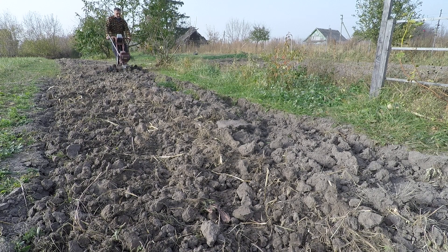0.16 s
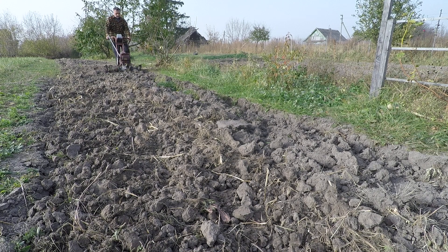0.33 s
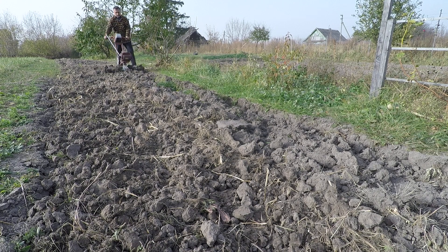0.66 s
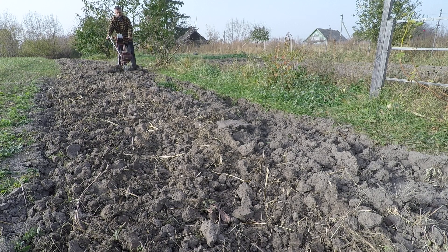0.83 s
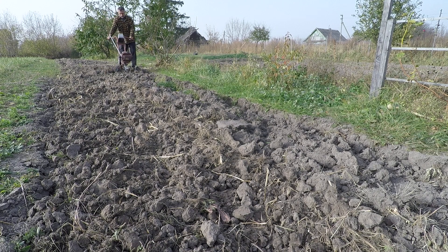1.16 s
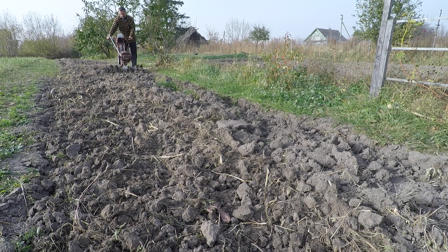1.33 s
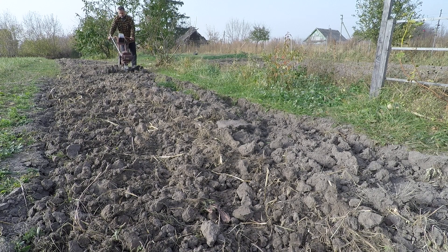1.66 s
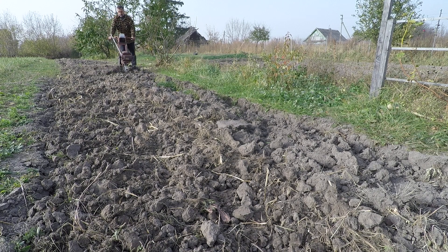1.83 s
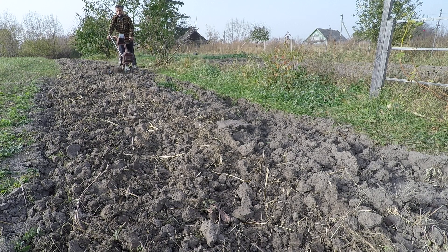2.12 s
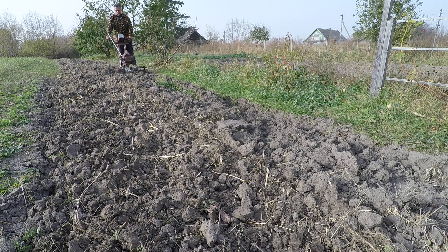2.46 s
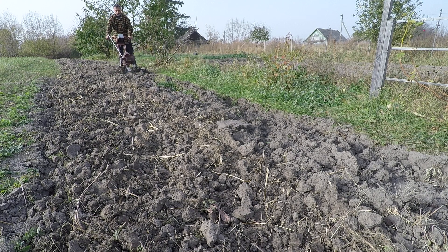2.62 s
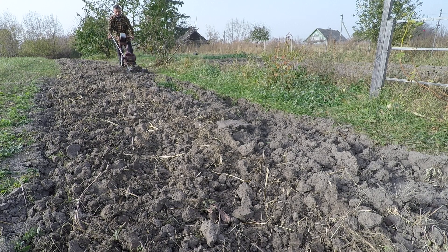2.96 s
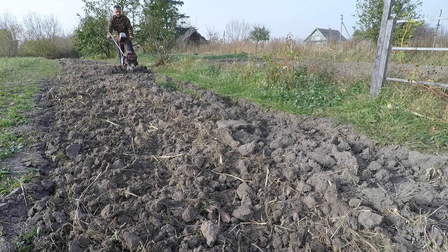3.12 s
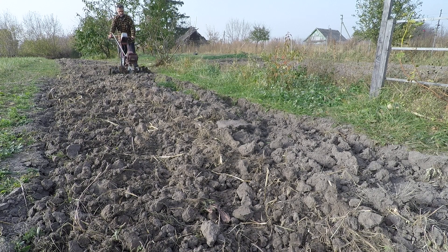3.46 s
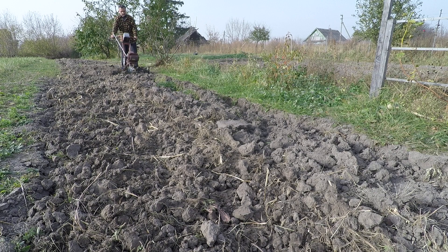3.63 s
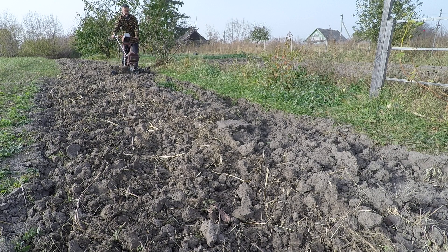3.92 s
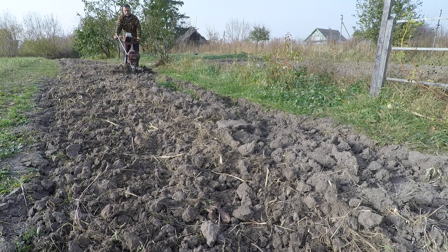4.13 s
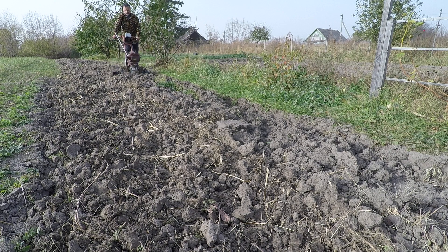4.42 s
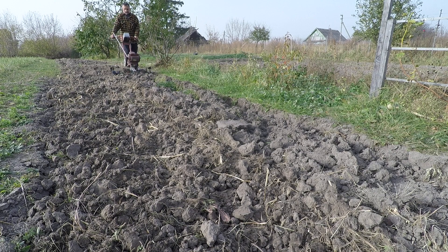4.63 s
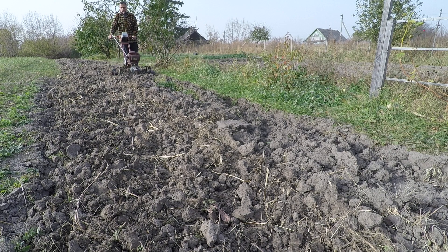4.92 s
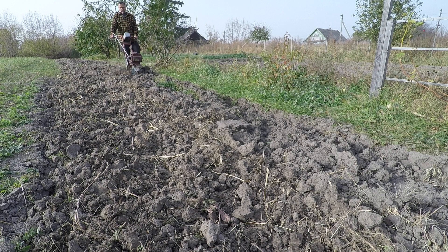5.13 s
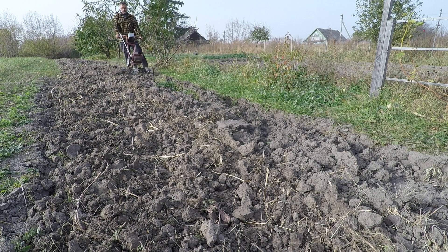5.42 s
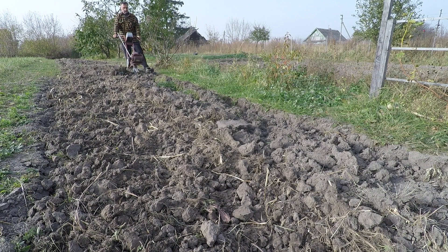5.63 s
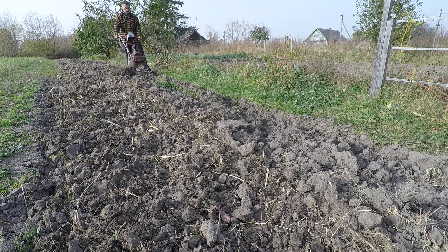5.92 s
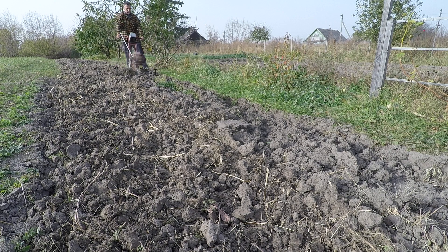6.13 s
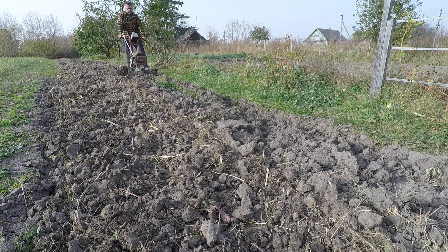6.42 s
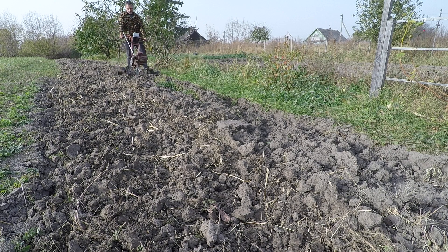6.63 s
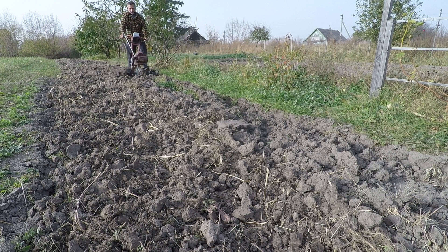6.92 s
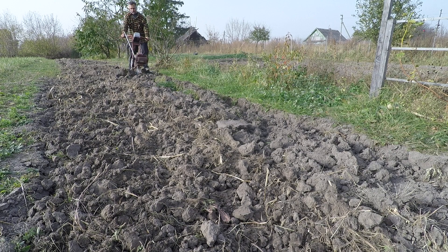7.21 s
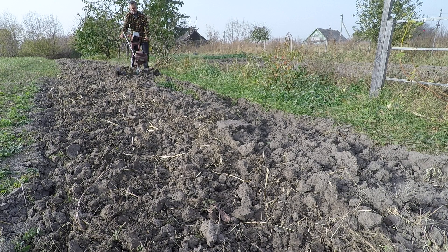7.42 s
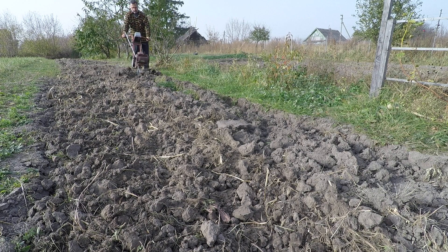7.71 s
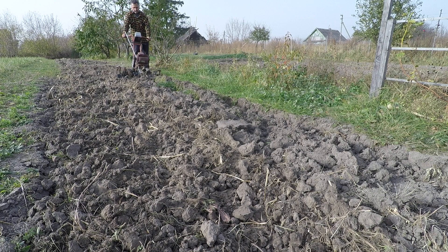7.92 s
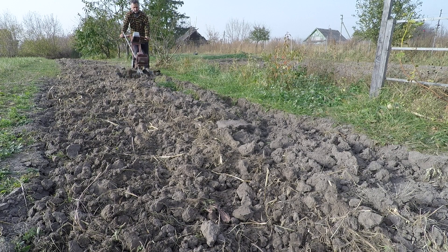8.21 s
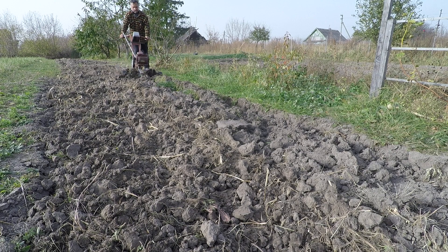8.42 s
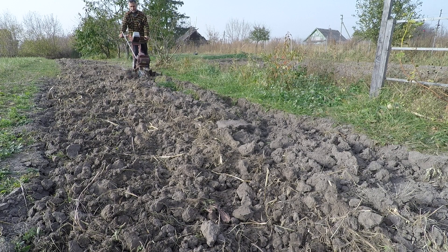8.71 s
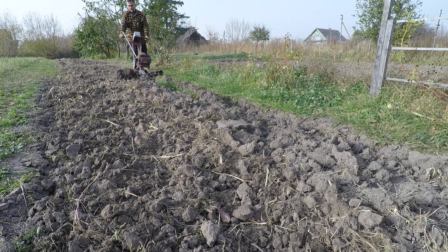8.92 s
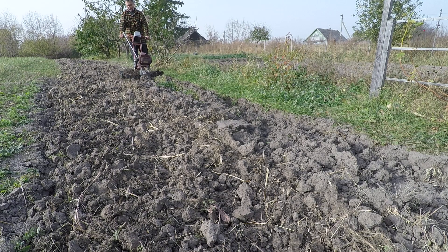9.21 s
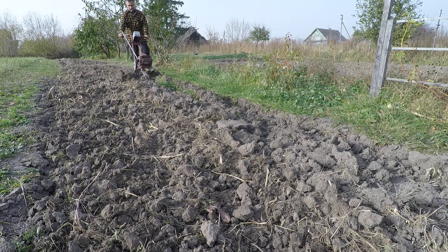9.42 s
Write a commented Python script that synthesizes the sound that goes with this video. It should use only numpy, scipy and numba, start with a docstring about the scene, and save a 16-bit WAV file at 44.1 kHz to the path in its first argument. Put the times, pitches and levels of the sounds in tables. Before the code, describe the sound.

An electric cultivator runs throughout in an open plot, heard from a distance in dry air: a steady, rough whirr with a low motor hum near 340 Hz, rapid gear knocking and a ringing housing. It throbs about seven times a second, with a faster flutter near 24, and wavers slightly under load. Fine grit hisses and ticks faintly, briefly clearer near 5.9 s; a barely audible high whistle stays constant. Wind hits the bare microphone as deep, muffled rumble: a thump at the start, scattered puffs to 3.5 s, stronger gusts at 4.1 and 4.6 s, frequent buffets from 5 to 6.6 s, then the heaviest booming bursts at 7.1-7.5 and 7.9 s, slightly rounded by overload. More thuds follow at 8.2-8.3 s before it eases, leaving the machine clearer. Small stones ping the tines near 1.6, 4.1, 8.3-8.4 and 9.5 s. It ends still running.

```python
"""Wind gusts rumble on a bare microphone over the knocking whirr of an electric cultivator in hard ground.
Wind is band-passed noise under a moving low-pass; buffets are short bursts of integrated noise.
Gear teeth knock in noise bursts that ring the housing, throbbing with each turn of pinion and wheel.
Soil ticks on the guard as random impulses, stones ping the tines as decaying sines, and the motor drive
whistles on faint steady lines."""
import sys
import numpy as np
from scipy import signal
from scipy.fft import rfft, irfft, next_fast_len
from scipy.io import wavfile
from scipy.ndimage import uniform_filter1d
from numba import njit

SR = 44100
rng = np.random.default_rng(int(sys.argv[2]) if len(sys.argv) > 2 else 0)


def master(y):
    """Save y as 16-bit WAV."""
    cut = np.clip(np.atleast_2d(y).T, -1, 1)
    pcm = np.round(cut * 32767)  # scale
    wavfile.write(sys.argv[1], SR, pcm.astype(np.int16))


N = 422037

# breeze rumble on the microphone: (time [s], level [dB])
BREEZE = [(0, -32), (.8, -35.5), (1.3, -39), (2.2, -38.5), (3.2, -39.5), (3.9, -38), (4.3, -29), (5.3, -28),
          (5.8, -26.5), (6.8, -24.5), (7.3, -43), (7.72, -36), (8.0, -25.5), (8.35, -29), (8.75, -40),
          (9.57, -35)]
BREEZE_SHARP_DB, FLUTTER_DB, FLUTTER_PER_S = -21.5, 3, 14
# bell-shaped gusts: (centre [s], peak level [dB], half length [s], sharpness [dB])
GUSTS = [(0.027, -19.5, 0.019, -15), (0.262, -30.0, 0.03, -16), (0.433, -21.5, 0.042, -20),
         (0.826, -35, 0.034, -16), (1.528, -22, 0.024, -20.5), (1.74, -30.5, 0.063, -31),
         (2.077, -29, 0.018, -14), (2.312, -29, 0.036, -28), (2.42, -28, 0.022, -32),
         (2.627, -21.5, 0.077, -21), (2.913, -28.5, 0.05, -32), (3.494, -24.5, 0.048, -12),
         (4.1, -14.5, 0.046, -19.5), (4.378, -19.5, 0.024, -25), (4.556, -12, 0.024, -19.5),
         (4.765, -19.5, 0.02, -21.5), (4.957, -17.5, 0.058, -24), (5.267, -23, 0.024, -20),
         (5.473, -20.3, 0.022, -25), (5.555, -18, 0.022, -16.5), (5.71, -19.2, 0.069, -18),
         (5.83, -17, 0.02, -23), (5.937, -17.5, 0.05, -7), (6.11, -20.5, 0.038, -18),
         (6.44, -19, 0.038, -26), (6.602, -21.2, 0.023, -19), (6.924, -22.1, 0.022, -23),
         (7.095, -14, 0.034, -7.5), (7.255, -12.5, 0.062, -16.5), (7.44, -20.5, 0.056, -9.5),
         (7.546, -17, 0.014, -21), (7.62, -17.5, 0.022, -19), (7.9, -10.4, 0.047, -9),
         (8.187, -15.5, 0.044, -18.5), (8.3, -17, 0.034, -16), (8.464, -23, 0.02, -26),
         (8.657, -26.7, 0.1, -27), (8.902, -28, 0.021, -18), (9.168, -27, 0.06, -16.5),
         (9.368, -23, 0.017, -27), (9.534, -27.5, 0.042, -12)]
# sudden buffets: (centre [s], level [dB rms], low-pass corner [Hz], length [s])
BUFFETS = [(2.074, -23, 88.5, .04), (4.107, -29, 260, 0.032), (4.572, -27, 254, 0.047),
           (4.891, -29, 217, 0.044), (5.003, -28.5, 234, 0.041), (5.649, -26, 198, 0.062),
           (5.933, -26, 298, 0.043), (7.105, -16.5, 275, 0.053), (7.209, -16.5, 205, 0.066),
           (7.27, -18, 160, 0.049), (7.38, -27, 344, 0.039), (7.42, -19.5, 270, 0.061),
           (7.484, -20, 220, 0.0318), (7.86, -19, 285, 0.066), (7.898, -19.5, 330, 0.056),
           (7.935, -18, 740, 0.0279), (8.261, -19, 315, 0.029), (9.521, -33.5, 245, 0.036)]
# stones on a tine: (time [s], level [dB])
STONES = [(0.3466, -39), (1.5582, -29), (1.8627, -34), (2.3805, -42), (4.0886, -30), (5.0615, -35),
          (8.32, -29), (8.403, -30), (9.223, -37), (9.523, -28)]
# tine modes: (frequency [Hz], level [dB], 60 dB decay time [s])
TINE_MODES = [(1128, -1.5, 0.06), (1496, -5, 0.052), (1230, -6, 0.03)]
# motor drive's comb of faint lines: (frequency [Hz], mean level [dB rms])
WHISTLE_LINES = [(9539, -77.5), (9687, -76.5), (9763, -74.5), (9838, -75), (9913, -75), (10061, -72),
                 (10212, -78.5)]
# grit on the guard: (time [s], level [dB])
GRIT = [(0, -48), (.45, -47), (.7, -55), (1.75, -49), (2.1, -57), (3.0, -50.5), (3.85, -56), (5.4, -55),
        (5.6, -47), (5.94, -41), (6.02, -69), (6.55, -64), (6.7, -53), (8.4, -56), (9.1, -49), (9.57, -60)]
# motor speed: (time [s], knock rate [1/s])
KNOCK_RATE = [(0, 341), (2.2, 340.5), (2.75, 338.8), (3.75, 342), (5, 341.2), (9.57, 341)]
PINION_KNOCKS, WHEEL_KNOCKS = 14, 46  # knocks per turn, two a tooth
# colour of the motor and fan noise: (frequency [Hz], relative density [dB per Hz])
WHIRR_COLOUR = [(88, -49), (150, -2), (348, -7), (431, -9.5), (1290, -3), (1480, -3.5), (1830, -6.5),
                (2140, -2), (3550, -6.5), (4080, -2), (5360, -7), (14800, -27), (16000, -22)]
WHIRR_DB, HUM_DB, TAP_DB = -2.5, -12.5, -11.5  # relative, inside the machine
# housing and guard modes: (frequency [Hz], throbs per wheel turn [count])
HOUSING_MODES = [(403, 1), (655, 2), (730, 1), (1114, 1), (1480, 1), (2068, 1), (2172, 1), (2371, 2),
                 (2440, 1), (2885, 1), (2995, 2), (3100, 1), (3320, 1), (3913, 2), (3972, 2), (4023, 4),
                 (4070, 6), (4800, 1), (5650, 2), (7500, 1), (8000, 1), (8600, 3), (9810, 1), (11080, 4)]
# ringing of those modes: (width [Hz], relative level [dB], pinion throb [dB], wheel throb [dB])
HOUSING_RINGING = [(32.6, -25, 1.5, 0.5), (44, -14, -2, 2.5), (81, -17.5, -0.5, 3), (90, -25, 12, -2),
                   (105, -12, -0.5, 2), (17.2, -17.5, -1.5, 4.5), (20.7, -9.5, -0.5, 1),
                   (17.7, -11, 2.5, 2.5), (130, -17.5, -1, 6.5), (72, -12, -1, 1), (64, -16, 2.5, 5.5),
                   (21.5, -17, 0, 2), (100, -24.5, -3, 13), (9, -19, -3.5, -12), (20, -12, 1.5, 2.5),
                   (13, -19.5, 8, 13), (120, -16, -2, 7), (350, -17, 5.5, 5), (262, -20, 3.5, 4),
                   (300, -22, 3.5, -0.5), (375, -16.5, -0.5, 6.5), (300, -58, 8, 28), (346, -26, 0.5, 24),
                   (420, -24, 4.5, -1)]
# machine's level, wandering slightly as it works: (time [s], level [dB])
TILL = [(0, -38), (1.3, -39), (2.4, -38), (3.6, -39), (4.5, -39.5), (5.3, -39), (5.5, -38), (5.95, -36.5),
        (6.05, -39.5), (7.2, -36.5), (7.5, -38), (8.0, -37), (8.3, -38), (9.57, -36.5)]
# brief swells and dips of the machine: (centre [s], change [dB])
SWELLS = [(.43, 2.5), (1.36, 2), (1.45, -1.5), (4.0, -2.5), (4.5, 2.5), (4.87, 2.5), (5.36, -2.5),
          (5.45, 2), (6.24, 2.5), (6.77, 0.5), (7.48, -3), (7.59, 2), (8.21, -2.5), (9.32, 1.5)]
SWELL_HALF_S = 0.027
LURCH_DB, LURCH_PER_S = .5, 7  # the machine rocks on the clods
TOP_HZ = 15300


def undb(db):
    """Gain of a level in dB."""
    return 10 ** (np.asarray(db) / 20)


def unit(x):
    """Scaled to rms 1."""
    return x / np.sqrt(np.mean(x ** 2))


def curves(table):
    """Columns of a table, interpolated to one value a sample."""
    time_s, *columns = np.transpose(table)
    return [np.interp(np.arange(N) / SR, time_s, c) for c in columns]


def walk(per_s):
    """Random levels held 1 / per_s seconds and slewed twice, rms 1."""
    hold = int(SR / per_s)
    steps = np.repeat(rng.standard_normal(N // hold + 1), hold)
    slewed = uniform_filter1d(uniform_filter1d(steps, hold), hold)
    return unit(slewed[:N])


def sway(per_s):
    """A walk less its half-second running mean, rms 1."""
    level = walk(per_s)
    return unit(level - uniform_filter1d(level, SR // 2))


def ring(x, hz, width_hz):
    """One resonance, rms 1."""
    return unit(signal.lfilter(*signal.iirpeak(hz, hz / width_hz, fs=SR), x))


def band(x, lo_hz, hi_hz, order=2):
    """Band-pass, rms 1."""
    return unit(signal.sosfilt(signal.butter(order, [lo_hz, hi_hz], "band", fs=SR, output="sos"), x))


@njit
def low(x, hz):
    """State-variable low-pass whose corner moves every sample."""
    y, b, l = np.empty(len(x)), 0., 0.
    for i in range(len(x)):
        g = np.tan(np.pi * hz[i] / SR)
        v = (b + g * (x[i] - l)) / (1 + g * (g + np.sqrt(2)))
        y[i] = l + g * v
        b, l = 2 * v - b, 2 * y[i] - l
    return y


def gusting():
    """Level and sharpness of the wind: gust power adds to a fluttering breeze; sharpness is power-weighted."""
    t = np.arange(N) / SR
    power = undb(2 * (curves(BREEZE)[0] + FLUTTER_DB * sway(FLUTTER_PER_S)))
    weighted_sharp = BREEZE_SHARP_DB * power
    for s, peak_db, half_s, sharp_db in GUSTS:
        near = slice(max(int((s - .4) * SR), 0), int((s + .4) * SR))
        gust = undb(2 * peak_db) * np.exp(-((t[near] - s) / max(half_s, .01)) ** 2)
        power[near] += gust
        weighted_sharp[near] += sharp_db * gust
    return np.sqrt(power), weighted_sharp / power


def buffet(corner_hz, count):
    """Dense burst: integrated noise held to two octaves under the corner, hann-shaped, rms 1."""
    low_pass = signal.butter(4, corner_hz, fs=SR, output="sos")
    high_pass = signal.butter(1, corner_hz / 4, "high", fs=SR, output="sos")
    burst = signal.sosfilt(low_pass, np.cumsum(rng.standard_normal(8192)))
    burst = signal.sosfilt(high_pass, burst)[-count:]
    return unit(burst * np.hanning(count))


def wind():
    """Eddies on the bare port: sharper gusts shed smaller eddies, so the rumble reaches higher."""
    rumble, sharp_db = gusting()
    corner_hz = np.clip(230 * undb(.5 * sharp_db + 1.4 * walk(40)), 25, 900)
    eddies = band(rng.standard_normal(N), 19.2, 52.3, order=1)
    eddies = low(low(eddies, corner_hz), 3.0 * corner_hz)
    # gust strength sets the level; single eddies still stand out
    local_rms = np.sqrt(uniform_filter1d(eddies ** 2, int(.12 * SR)) + 1e-9)
    out = rumble * eddies / local_rms
    for s, db, reach_hz, length_s in BUFFETS:
        count = int(max(length_s, .01) * SR)
        at = int(s * SR) - count // 2
        out[at:at + count] += undb(db) * buffet(reach_hz, count)
    return out


def stones():
    """A short knock sets the tine modes ringing as decaying sines."""
    out, t = np.zeros(N), np.arange(SR // 5) / SR
    ping = sum(undb(db - 60 * t / t60_s) * np.sin(2 * np.pi * hz * t) for hz, db, t60_s in TINE_MODES)
    ping *= np.minimum(t / 0.0031, 1)  # 3.1 ms rise
    for s, level_db in STONES:
        at = int(s * SR)
        out[at:at + len(t)] += undb(level_db) * ping[:N - at]
    return out


def whistle():
    """Motor drive's steady tones, each wavering a little in level."""
    t, out = np.arange(N) / SR, 0
    for hz, db in WHISTLE_LINES:
        tone = np.sqrt(2) * np.sin(2 * np.pi * (hz * t + rng.random()))
        out = out + undb(db + 1.3 * walk(3)) * tone
    return out


def soil(bite, per_s=480, spread_db=3.0):
    """Grit ticks on the guard as random impulses over faint noise, denser as the load rises."""
    chance = rng.random((2, N))
    hit = chance[0] < per_s / SR * undb(2.2 * bite)
    size = undb(-spread_db * np.log(1 - chance[1]))
    ticks = hit * size * np.sign(rng.standard_normal(N))
    return band(ticks + 0.1 * rng.standard_normal(N), 8300, 22000, order=1)


def knocks(turn, decay, weak_db, scatter_db, steady):
    """Noise bursts at each tooth contact, every second one offset by weak_db; decay in knock periods."""
    contact = turn.astype(int)
    scatter = rng.standard_normal(contact[-1] + 1)[contact]
    size_db = weak_db * (contact % 2) + scatter_db * scatter
    bursts = undb(size_db) * np.exp(-(turn % 1) / decay)
    return unit((steady + bursts) * rng.standard_normal(N))


def hum(turn):
    """Motor sine at the knock rate."""
    return np.sin(2 * np.pi * turn)


def whirr(turn, bite):
    """Broad motor and fan noise: knocking noise coloured in the spectrum, stronger under load."""
    hz, db = np.transpose(WHIRR_COLOUR)
    size = next_fast_len(N)
    bin_hz = np.arange(size // 2 + 1) * SR / size
    colour = undb(np.interp(np.log(bin_hz + 1), np.log(hz), db))
    drive = knocks(turn, 0.05, -11, 3.1, 0.36)
    noise = unit(irfft(rfft(drive, size) * colour, size)[:N])
    return noise * undb(WHIRR_DB + 0.73 * bite)


def tap(pinion):
    """One high tooth taps once a pinion turn, a little early or late, and rings a broad mode."""
    at = np.flatnonzero(np.diff(np.floor(pinion / (2 * np.pi) + .12)))
    chance = rng.standard_normal((len(at), 3))
    out = np.zeros(N)
    for side, lag_s in enumerate((0, .005)):  # the blow and its rebound
        offset = ((lag_s + 0.001534 * chance[:, side]) * SR).astype(int)
        out[np.clip(at + offset, 0, N - 1)] += undb(1.15 * chance[:, -1])
    return ring(ring(out, 1490, 103), 1487, 100)


def housing(turn, pinion, wheel, bite):
    """Each mode throbs with the gears and swells slowly alone; in the treble it breaks into grains."""
    drive, out = knocks(turn, 0.23, -2.5, 2.35, 0.32), 0
    for (hz, order), (width_hz, db, pinion_db, wheel_db) in zip(HOUSING_MODES, HOUSING_RINGING):
        lag = 2 * np.pi * rng.random(2)
        uneven = np.cos(order * wheel + lag[0]) + 0.61 * np.cos(4 * wheel + lag[1])
        grain_db = min(hz / 8000, 1.2) ** 2 * (3.2 * walk(60) + 1.2 * bite)
        throb_db = pinion_db * np.cos(pinion) + wheel_db * uneven + grain_db
        swell_db = (0.76 + 18 / width_hz) * walk(6)  # narrow modes swing more
        out = out + undb(db + swell_db) * ring(drive * undb(throb_db), hz, width_hz)
    return out


def working_db():
    """Machine level: its slow wander, slight rocking, brief swells and dips."""
    t = np.arange(N) / SR
    swells_db = sum(db * np.exp(-((t - s) / SWELL_HALF_S) ** 2) for s, db in SWELLS)
    return curves(TILL)[0] + LURCH_DB * sway(LURCH_PER_S) + swells_db


def cultivator():
    """Gear rotation and load drive the housing, taps, whirr, hum and thrown grit."""
    turn = np.cumsum(curves(KNOCK_RATE)[0] * (1 + .004 * walk(60))) / SR  # in knocks
    pinion = 2 * np.pi * turn / PINION_KNOCKS + .1
    wheel = 2 * np.pi * turn / WHEEL_KNOCKS
    bite = 1.17 * np.sin(wheel) + 0.19 * np.cos(pinion) + 1.0 * walk(28) + 0.29 * walk(7.5)  # load
    gears = housing(turn, pinion, wheel, bite) + undb(TAP_DB) * tap(pinion)
    motor = whirr(turn, bite) + undb(HUM_DB + 2.6 * sway(18)) * hum(turn)
    grit = undb(curves(GRIT)[0] + 1.0 * bite) * soil(bite)
    return undb(working_db()) * (gears + motor) + grit


def scene():
    """Wind and machine on one microphone."""
    return (wind() + stones() + whistle() + cultivator())[None, :]


def record(dry):
    """The microphone slightly rounds the strongest gusts; a steep low-pass cuts the top."""
    top = signal.ellip(16, .3, 70, TOP_HZ, fs=SR, output="sos")
    rounded = np.tanh(.8 * dry) / .8
    return signal.sosfilt(top, rounded)


dry = scene()
out = record(dry)
master(out)
```